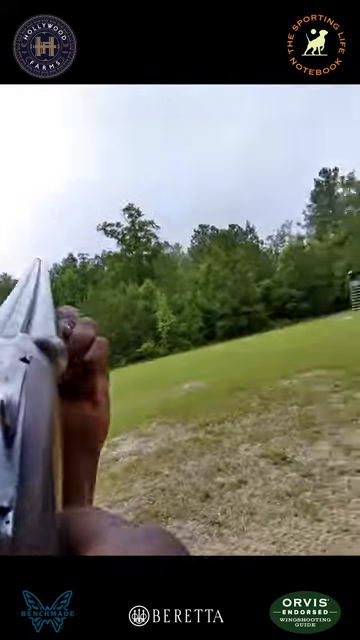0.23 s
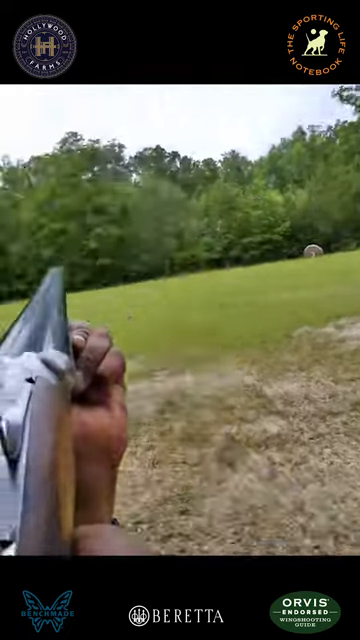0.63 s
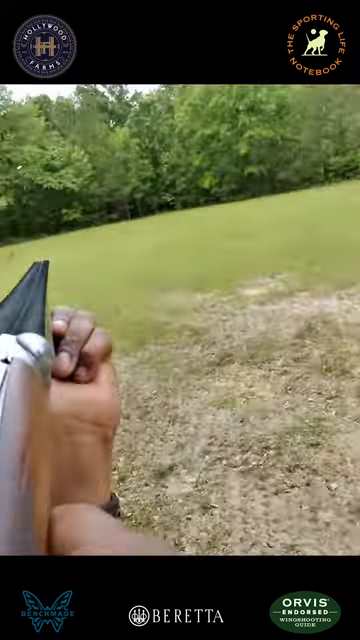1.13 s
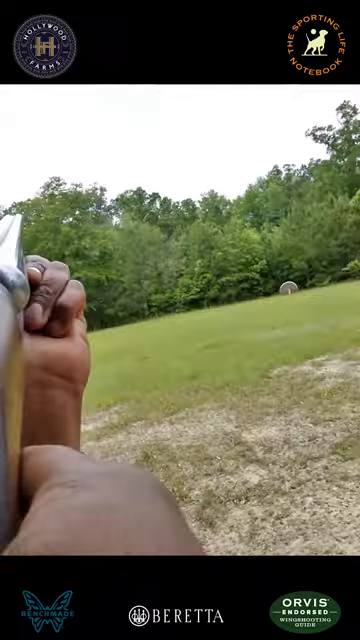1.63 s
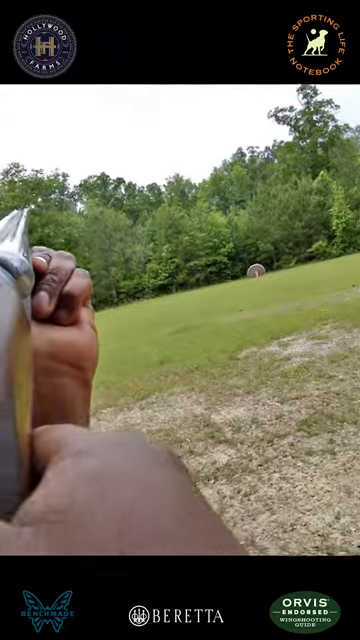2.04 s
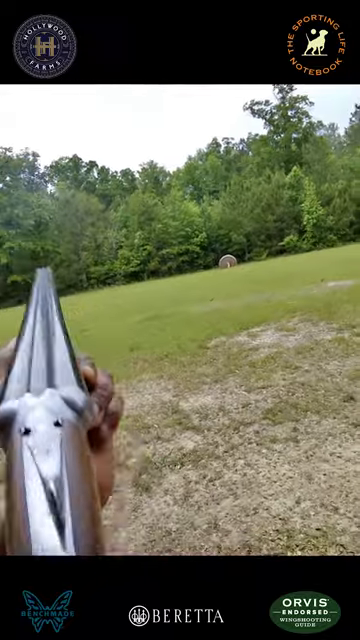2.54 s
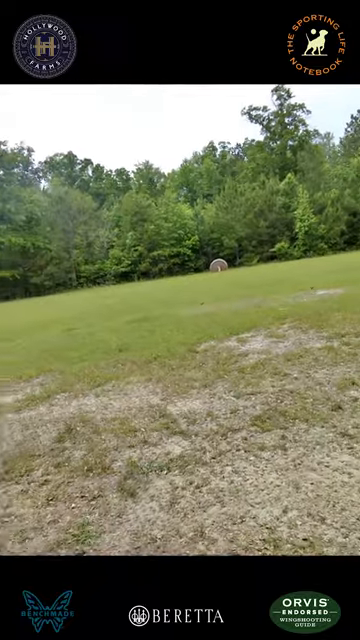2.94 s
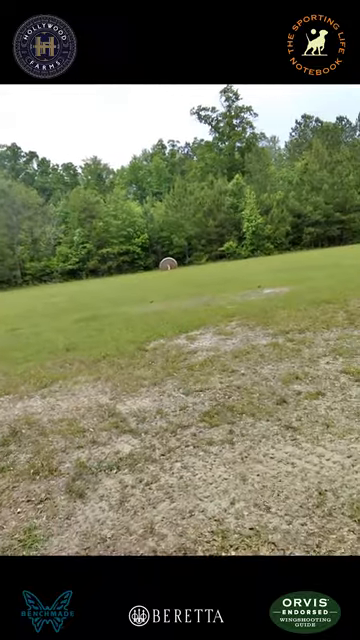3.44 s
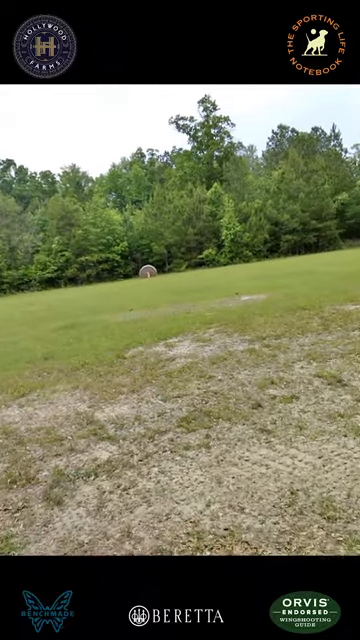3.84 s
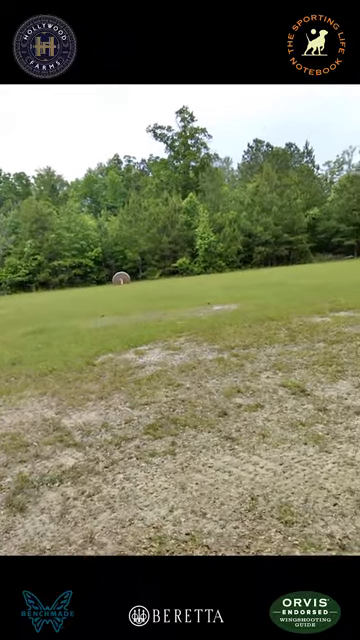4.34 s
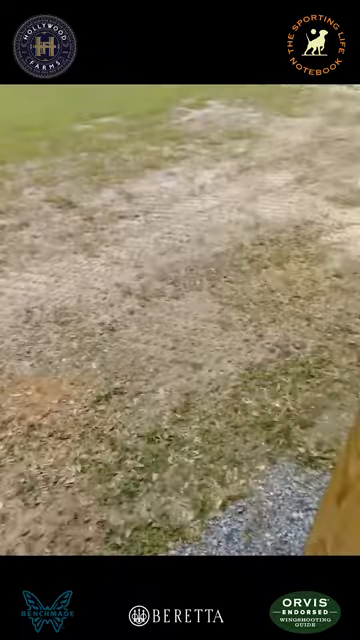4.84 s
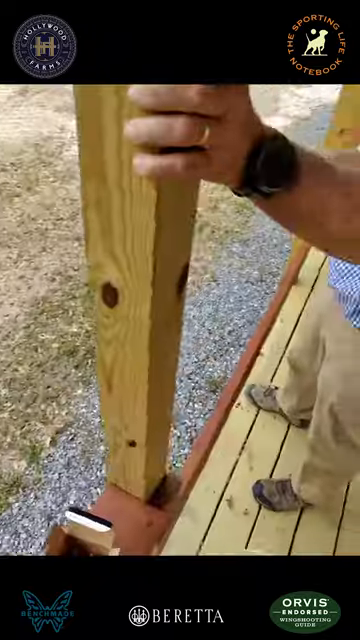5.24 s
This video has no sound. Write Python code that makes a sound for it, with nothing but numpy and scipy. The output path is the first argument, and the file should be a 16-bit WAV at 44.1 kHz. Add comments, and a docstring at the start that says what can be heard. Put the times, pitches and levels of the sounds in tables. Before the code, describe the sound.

Two close shotgun blasts about two seconds apart, each rolling off through the trees, then the gun clacks open with sharp metallic clicks.

```python
"""Two shotgun shots by a wood

Two shots go off close to a pair of microphone ports, over a meadow edged by a wood.
Each blast is a few short rings with noisy crackle; after a quarter-second hush, many random small echoes
from the trunks swell and roll away, ever duller. Filtered noise makes hiss, murmur, rustling cloth and wind;
short sines make the wind's thuds, ringing noise the clicks of the gun's action, gliding sines the bird peeps."""
import sys
import numpy as np
from scipy import signal
from scipy.fft import rfft, irfft, next_fast_len
from scipy.io import wavfile
from scipy.ndimage import uniform_filter1d

SR = 44100
rng = np.random.default_rng(int(sys.argv[2]) if len(sys.argv) > 2 else 0)


def dump_mix(stems):
    """Bounce the given channels to the path in sys.argv[1] as a 16-bit WAV at rate SR."""
    frames = np.atleast_2d(stems).T  # one column per channel
    limited = np.clip(frames, -1, 1)  # hard clip at full scale
    pcm = np.round(limited * 32767).astype(np.int16)
    wavfile.write(sys.argv[1], SR, pcm)


N = 242221
T = np.arange(N) / SR  # time in s
M = next_fast_len(N)  # padded length for quick Fourier transforms
F = np.fft.rfftfreq(M, 1 / SR)  # frequencies in Hz
OPPOSITE = np.array([[1], [-1]])  # plus in the left channel, minus in the right

# single strong echoes from big trunks: t/s, level/dB
STRONG_ECHOES = [(0.6103, -13), (0.737, -15.5), (0.863, -12), (1.103, -22), (2.762, -18), (2.998, -10)]


def undb(db):
    """Turn decibels into a factor that multiplies the pressure."""
    return 10 ** (np.asarray(db) / 20)


def unit(x):
    """Scale a sound to an average strength (rms) of 1."""
    return x / np.sqrt(np.mean(x ** 2))


def along(table, hz):
    """Read between (f/Hz, value) points on a logarithmic frequency axis."""
    f, value = np.transpose(table)
    return np.interp(np.log(hz + 1), np.log(f + 1), value)


def colour(x, table, size=2048):
    """Give a sound the listed spectrum with a filter that never responds ahead of its input."""
    log_gain = np.log(undb(along(table, np.fft.rfftfreq(size, 1 / SR))))
    # folding the cepstrum (transform of the log gain) onto positive times gives minimum phase
    cepstrum = irfft(log_gain)
    cepstrum[1:size // 2] *= 2
    cepstrum[size // 2 + 1:] = 0
    response = irfft(np.exp(rfft(cepstrum)))
    return signal.fftconvolve(x, response)[:len(x)]


def grains(rate, spread_db):
    """Scatter about `rate` random impulses per second, a few much larger than the rest."""
    struck = rng.random(N) < rate / SR
    sign = rng.choice([-1, 1], N)
    size = undb(spread_db * rng.exponential(size=N))
    return unit(struck * sign * size)


def walk(rate):
    """Wander slowly and at random, with `rate` new values per second and an rms of 1."""
    k = int(SR / rate)
    steps = np.repeat(rng.standard_normal(N // k + 1), k)
    return unit(uniform_filter1d(uniform_filter1d(steps, k), k)[:N])


def add(out, s, x):
    """Mix the sound x into out, starting at s seconds."""
    i = int(s * SR)
    out[..., i:i + x.shape[-1]] += x[..., :N - i]


def sides(pan_db):
    """Split a left-minus-right level difference over the two channels."""
    return np.array([[pan_db], [-pan_db]]) / 2


def ports(x):
    """A close sound reaches the two ports with its own balance and phase at each frequency."""
    # left minus right: f/Hz, level/dB
    balance = [(60, 1.5), (110, 8.5), (200, 1), (380, -1), (700, 2), (1290, 2), (2380, 7.5), (4400, 1),
               (8120, 6), (15000, 11.5)]
    # how far the left port leads: f/Hz, phase/rad
    phase_lead = [(0, -1), (2500, 0.5), (4050, 8), (5000, 4.5), (5680, 3.5), (6630, 7.5), (7240, 8),
                  (10100, 4.5), (10600, 5.5), (11300, 3.5), (12600, 12.5), (12800, 1.5), (14200, -10),
                  (16200, -7.5)]
    db, lead = along(balance, F), along(phase_lead, F)
    spectrum = rfft(x, M)
    return np.array([irfft(spectrum * undb(s * db / 2) * np.exp(1j * s * lead / 2), M)[:N] for s in (1, -1)])


def aftermath():
    """After each shot, echo level, echo treble and hiss follow one course; strong echoes add short swells."""
    # shots: t/s, change of echo level/dB, change of hiss level/dB, stretch of the course (1 = as listed)
    shots = [(0.102, 0.62, 1.5, 1.039), (2.227, -0.8, -0.5, 0.99)]
    # course after a shot: t/s, echo level/dB, treble setting/dB (higher is brighter), hiss level/dB
    course = [(0.04, -42, -10.5, -52.5), (0.1, -47.5, -6.5, -56.5), (0.221, -54, -7, -61),
              (0.291, -30, -4.5, -43), (0.33, -26.5, -4, -46), (0.5, -23.5, -4.5, -53.5),
              (0.76, -22, -13, -63), (0.95, -28.5, -15, -67), (1.3, -34, -23, -70.5), (1.75, -43, -26, -85),
              (2.101, -48, -23, -74.5), (3.3, -59, -22, -73)]
    # before any shot: echo level/dB, treble setting/dB, hiss level/dB
    quiet = (-74.5, 3.5, -75)
    after, *columns = np.transpose(course)
    echo_db, presence_db, hiss_db = (np.full(N, 1. * db) for db in quiet)
    for s, strength_db, air_db, length in shots:
        on, age = T > s, (T - s) / length
        echo_db = np.where(on, np.interp(age, after, columns[0]) + strength_db, echo_db)
        presence_db = np.where(on, np.interp(age, after, columns[1]), presence_db)
        hiss_db = np.where(on, np.interp(age, after, columns[2]) + air_db, hiss_db)
    # small echoes crowd round each strong one
    swell_db, swell_s = 1.5, 0.011
    crowd_db = sum(swell_db * np.exp(-((T - s) / swell_s) ** 2) for s, _ in STRONG_ECHOES)
    roll_db = 1.12 * walk(14)  # the whole echo rolls unevenly
    return echo_db + crowd_db + roll_db, presence_db, hiss_db


def wood(echo_db, presence_db):
    """Dense small echoes from the trunks; longer paths through air and leaves lose their treble first."""
    # colour of the echoes: f/Hz, level/dB
    echo_colour = [(59, -39.5), (100, -16.5), (335, -10), (540, -3), (968, -1), (1500, -9.5), (2090, -10.5),
                   (3380, -31.5), (4160, -32), (5450, -41), (7930, -41), (12500, -62.5), (14500, -57)]
    # the part that differs between channels, against the common part: f/Hz, level/dB
    width = [(60, -23), (110, -32.5), (200, -43.5), (380, -35.5), (700, -34.5), (1290, -19), (2380, -7.5),
             (4400, 2), (8120, -4.5), (15000, 6)]
    hits = grains(2500, 1.333) * undb(echo_db)
    spread = rng.standard_normal(N) * undb(echo_db)
    scale = np.std(colour(rng.standard_normal(N), echo_colour))
    mid = rfft(colour(hits, echo_colour), M) / scale
    side = rfft(colour(spread, echo_colour), M) / scale * undb(along(width, F))
    out = 0
    for hz in 88 * 2 ** np.arange(0, 8, .5):  # overlapping bands half an octave apart
        band = np.clip(1 - np.abs(2 * np.log2((F + 1) / hz)), 0, 1)
        # how strongly the treble setting acts on this band
        loss = np.clip(np.log2(hz / 1006.0) / 1.76, -.3, 1.3)
        gain = undb(loss * (presence_db + 8.0) + 1.0 * walk(13))
        out = out + gain * (irfft(mid * band, M)[:N] + irfft(side * band, M)[:N] * OPPOSITE)
    return out


def hiss(db):
    """Air hisses as smooth noise; rubbing cloth crackles as its fibres catch."""
    # rubs of cloth: t/s, level/dB, length/s, fade/s
    rubs = [(0.964, -44, 0.048, 0.034), (1.026, -53, 0.024, .01), (1.096, -43.5, 0.032, 0.031),
            (1.202, -53.5, 0.023, .04), (1.290, -61, .03, .02), (1.396, -54, 0.011, 0.022),
            (1.937, -71, 0.033, 0.025), (4.115, -63, .03, 0.0063), (3.15, -70.5, .15, .04),
            (4.165, -62, .03, .03), (4.42, -50.5, .02, .06), (5.018, -68, 0.1, 0.039),
            (5.14, -54, .04, .03), (5.38, -70.5, .04, 0.02)]
    # colour of the cloth: f/Hz, level/dB
    cloth_colour = [(1760, -37.5), (3000, -8.5), (5540, -18), (6960, -8), (8640, -13.5), (13200, -3.5),
                    (14400, -9), (15000, -39)]
    # colour of the hiss: f/Hz, level/dB
    air_colour = [(1650, -35.5), (2800, -4), (3310, -10.5), (3530, -11), (5340, -16.5), (5770, -11),
                  (10300, -12.5), (13700, -14), (15000, -16)]
    rub = np.zeros(N)
    t = np.arange(int(.4 * SR)) / SR
    for s, rub_db, length, fade in rubs:
        rise = 1 - np.exp(-t / .003)
        add(rub, s, undb(rub_db) * rise * np.exp(-np.clip(t - length, 0, None) / fade))
    cloth = ports(unit(colour(grains(6000, 2.8), cloth_colour))) * undb(1.9 * walk(83))
    near = ports(unit(colour(rng.standard_normal(N), air_colour)))
    # separate noise in each channel
    far = np.array([unit(colour(rng.standard_normal(N), air_colour)) for _ in range(2)])
    return undb(db + .7 * walk(40)) * (1.31 * near + 0.39 * far) + rub * cloth


def wind(db):
    """Eddies rumble on the ports in gusts; single thuds of wind or hand are short low sines."""
    # colour of the rumble: f/Hz, level/dB
    rumble_colour = [(20, -23.5), (40, -14), (80, 7.5), (130, -4.5), (250, -5), (500, -61.5)]
    # thuds: t/s, level/dB, f/Hz
    thuds = [(1.676, -35, 122), (1.747, -32.5, 69), (1.809, -35, 121), (1.849, -44, 79), (1.93, -39, 83.4),
             (2.028, -39, 94.2), (2.159, -36, 104), (3.459, -38, 157), (3.804, -33, 104),
             (3.824, -28.5, 113), (3.855, -32.5, 72.7), (4.029, -40, 164), (4.307, -40, 87.5),
             (4.892, -39.5, 92.6), (4.924, -43.5, 84.5)]
    eddies = unit(colour(grains(220, 1.0), rumble_colour))
    difference = .2 * unit(colour(rng.standard_normal(N), rumble_colour)) * OPPOSITE
    out = undb(db + 2.6 * walk(8.1)) * (eddies + difference)
    t = np.arange(int(.06 * SR)) / SR
    for s, thud_db, hz in thuds:
        hump = np.exp(-((t - .008) / 0.0061) ** 2)
        add(out, s, undb(thud_db) * np.sin(2 * np.pi * hz * t) * hump)
    return out


def murmur():
    """The countryside murmurs faintly and without a break, as low noise of wandering level."""
    # colour of the murmur: f/Hz, level/dB
    low_colour = [(120, -21.5), (220, -3), (350, 2), (480, -8), (800, -30)]
    level_db = -65.5 + 1.9 * walk(10)
    return undb(level_db) * unit(colour(rng.standard_normal(N), low_colour))


def action():
    """Steel parts strike: a bright tick, a dull knock, and a body of noise and ringing modes."""
    # clicks of trigger, lever, ejector and hands:
    # t/s, tick level/dB, steel body level/dB, knock level/dB, time to fall by 60 dB/s
    clicks = [(0.0858, -53, -63, -42, 0.075), (2.190, -64, -46.5, -68, 0.017),
              (2.2098, -51, -48, -65.5, 0.016), (3.873, -52, -48, -68, 0.0088),
              (3.879, -68, -70, -58.5, 0.014), (4.127, -49, -45.5, -73, 0.017),
              (4.1545, -16.5, -23, -50, 0.014), (4.162, -34, -49, -57, 0.035),
              (4.3857, -19.5, -30.5, -50, 0.047), (4.402, -14, -22.5, -46, 0.015),
              (4.4045, -8.5, -20.5, -21, 0.018), (4.413, -34, -42, -46.5, 0.028),
              (4.514, -70, -49.5, -85, .01), (4.449, -62, -51, -80, 0.017), (4.553, -62, -57, -77, 0.016),
              (4.633, -49.5, -56, -69, 0.016), (4.649, -47, -43.5, -54.5, 0.019),
              (4.726, -54.5, -55, -79, 0.011), (4.745, -59, -61, -78.5, 0.023),
              (5.1302, -34, -32.5, -45, 0.011), (5.1334, -32, -37, -29, 0.016),
              (5.165, -43, -38.5, -58, 0.016), (5.1801, -19.5, -30, -32, 0.0076),
              (5.267, -38, -48, -48, .006), (5.279, -36.5, -51.5, -62, 0.0067),
              (5.459, -46, -60, -66, 0.012), (5.465, -45, -70, -70, 0.011), (5.475, -43, -51.5, -66, 0.014)]
    # ringing modes of the steel: f/Hz, level/dB, time to fall by 60 dB/s
    modes = [(1960, -4.5, 0.029), (2500, -8.5, .035), (3400, -14, 0.025), (4220, -15.5, .05)]
    # colours of the three noises: f/Hz, level/dB
    tick_colour = [(4500, -29), (5600, -24.5), (6500, -5), (10000, 1), (12500, 5.5), (14500, -0.5), (16000, 2)]
    body_colour = [(900, -32.5), (1400, -4), (2300, -0.5), (3000, -9.5), (4400, -8), (5500, -28.5)]
    knock_colour = [(100, -19), (300, -5.5), (900, 3.5), (1500, -15.5)]
    bright = ports(unit(colour(rng.standard_normal(N), tick_colour)))
    body = ports(unit(colour(grains(2500, 2.3), body_colour)))
    knock = unit(colour(rng.standard_normal(N), knock_colour))
    t = np.arange(int(.1 * SR)) / SR
    rise = 1 - np.exp(-t / 0.00045)
    out = np.zeros((2, N))
    luck = rng.standard_normal((len(clicks), len(modes), 2))
    for (s, tick_db, body_db, knock_db, t60), blow in zip(clicks, luck):
        i = int(s * SR)
        n = min(len(t), N - i)
        decay = np.exp(-np.log(1000) * t / t60)
        fall = rise * (0.97 * np.exp(-t / 0.00048) + decay + 0.03 * np.exp(-t / 0.026))
        # each blow lands elsewhere, so the modes come out at other strengths and slightly other pitches
        ring = 0
        for (hz, mode_db, mode_t60), (a, b) in zip(modes, blow):
            tone = np.sin(2 * np.pi * hz * (1 + 0.0072 * b) * t)
            ring = ring + rise * undb(mode_db + 1.9 * a) * tone * np.exp(-np.log(1000) * t / mode_t60)
        noise = undb(tick_db) * bright[:, i:i + n] + undb(body_db) * body[:, i:i + n]
        noise = noise + undb(knock_db) * knock[i:i + n]
        # blows with much knock land on wood and hardly ring
        share = np.clip((body_db - knock_db) / 43.5, 0, 1)
        add(out, s, fall[:n] * noise + share * undb(body_db) * ring[:n])
    return out


def blasts():
    """Each pressure front rings briefly and throws crackle; the muzzle gas adds one slow push per shot."""
    # pressure fronts: t/s, ring level/dB, ring f/Hz, crackle level/dB,
    # direction (only the sign counts: + push, - pull), left minus right level/dB
    fronts = [(0.091, -24, 150, -32.5, -1, -4.5), (0.0966, -30, 496, -25, 1, -2.5),
              (.1000, -25, 898, -18, 0.87, -4), (0.1035, -1.5, 975, -14.5, 0.92, 0.5),
              (.1060, -0.5, 620, -11.5, 1, -5), (0.1087, -8, 647, -17.5, -1.1, -2),
              (.1105, -8.5, 700, -14.5, -1, -7), (.1160, -20.5, 710, -16.5, 1, -1),
              (2.2174, -21.5, 500, -22.5, 1, -5.5), (2.2239, -20.5, 600, -14.5, 1, -9.5),
              (2.2270, -6.5, 1860, -10, 1, -1.5), (2.2294, -0.5, 777, -11.5, 1, -5),
              (2.2347, -17, 300, -9, 1, -5.5), (2.2398, -30.5, 250, -21, -1, -4)]
    # slow pushes of the gas: t/s, level/dB, f/Hz, left minus right level/dB
    pushes = [(0.0982, -9.5, 76.4, -0.5), (2.221, -21.5, 90.2, 4)]
    # colour of the crackle: f/Hz, level/dB
    crackle_colour = [(180, -31.5), (300, -6.5), (627, -7.5), (750, -5.5), (3980, -13.5), (5260, -21),
                      (12700, -14), (14300, -17), (15000, -33.5)]
    t = np.arange(int(.12 * SR)) / SR
    body, puff = np.zeros((2, N)), np.zeros(N)
    for s, db, hz, crackle_db, sign, pan_db in fronts:
        ring = np.sin(2 * np.pi * hz * t) * np.exp(-t / 0.0013)
        add(body, s, np.sign(sign) * undb(db + sides(pan_db)) * ring)
        burst = (1 - np.exp(-t / 0.0018)) * (np.exp(-t / 0.003) + 0.071 * np.exp(-t / 0.013))
        add(puff, s - .001, undb(crackle_db) * burst)
    for s, db, hz, pan_db in pushes:
        push = np.sin(2 * np.pi * hz * t) * np.exp(-(t / 0.012) ** 2)
        add(body, s, undb(db + sides(pan_db)) * push)
    same = unit(colour(grains(9000, 2.8), crackle_colour))
    own = unit(colour(rng.standard_normal(N), crackle_colour))
    # swirling gas presses on each port differently, most in the bass
    swirl_colour = [(30, -4.5), (150, -2.5), (300, -5.5), (600, -16.0), (2000, -22.0)]  # f/Hz, level/dB
    swirl = unit(colour(rng.standard_normal(N), swirl_colour))
    return body + puff * (ports(same) + (0.22 * own + .25 * swirl) * OPPOSITE)


def dips():
    """Background level in dB: it drops at once at each listed time, then creeps back."""
    # drops: t/s, depth/dB
    drops = [(0.105, 11), (2.23, 12.5), (4.405, 13.5), (5.18, 2)]
    recover_s = 0.36
    return -sum(depth_db * (T > s) * np.exp(-np.abs(T - s) / recover_s) for s, depth_db in drops)


def trunks():
    """A few big trunks return the shot whole, as a short rounded wave of pull and push."""
    t = np.arange(int(.006 * SR)) / SR
    hump = np.exp(-((t - .0008) / 0.00079) ** 2)
    out = np.zeros(N)
    for s, db in STRONG_ECHOES:
        add(out, s, -undb(db) * np.sin(2 * np.pi * 950 * t) * hump)
    return out


def peep():
    """Small birds give thin high notes: pure tones whose pitch and level follow curves."""
    # one curve for each note: t/s, f/Hz, level/dB
    notes = [
        [(1.735, 12250, -60), (1.743, 12160, -46.5), (1.771, 12198, -58), (1.809, 12220, -55),
         (1.885, 12200, -94)],
        [(5.352, 6860, -86), (5.360, 6700, -72), (5.374, 6250, -81), (5.380, 6140, -72), (5.390, 5800, -78.5)],
    ]
    out = 0
    for note in notes:
        s, hz, db = np.transpose(note)
        tone = np.sin(2 * np.pi * np.cumsum(np.interp(T, s, hz)) / SR)
        level_db = np.interp(T, s, db, left=-140, right=-140)
        # root 2 gives the sine an rms of 1
        out = out + np.sqrt(2) * tone * undb(level_db + sides(3.4))
    return out


def scene():
    """Add up all sounds at the two ports; the dips act on echoes, hiss, cloth level aside, and gusts."""
    # gusts: t/s, wind level/dB
    gusts = [(0.0, -66), (0.4, -61), (0.54, -49.5), (0.7, -73), (0.96, -61), (1.2, -53), (1.45, -67),
             (1.64, -47), (1.87, -43), (2.15, -50), (2.75, -70), (2.88, -49.5), (3.05, -59), (3.28, -46.5),
             (3.63, -55.5), (4.14, -51.5), (4.5, -63), (5.49, -63)]
    echo_db, presence_db, hiss_db = aftermath()
    dip_db = dips()
    gust_db = np.interp(T, *np.transpose(gusts))
    field = wood(echo_db + dip_db, presence_db) + hiss(hiss_db + dip_db) + wind(gust_db + dip_db)
    return blasts() + field + trunks() + murmur() + action() + peep()


def record(dry):
    """The loudest peaks are rounded; the microphone falls off above 14 kHz and the top is cut."""
    rounded = np.tanh(1.209 * dry) / 1.137
    fall_off = signal.ellip(8, .3, 42, 14150, fs=SR, output="sos")
    top_cut = signal.ellip(8, .2, 70, 16400, fs=SR, output="sos")
    return signal.sosfilt(top_cut, signal.sosfilt(fall_off, rounded))


dry = scene()
out = record(dry)
dump_mix(out)
```